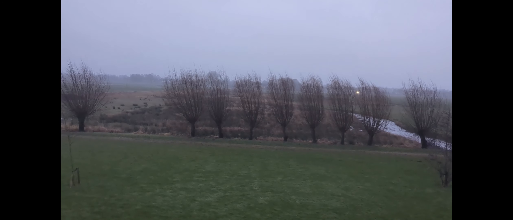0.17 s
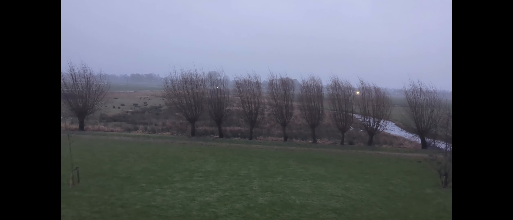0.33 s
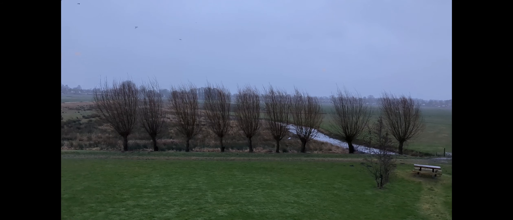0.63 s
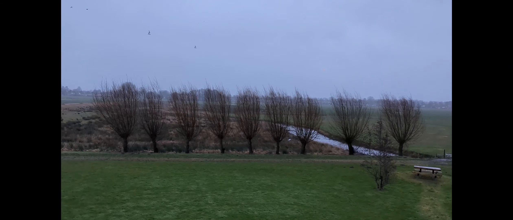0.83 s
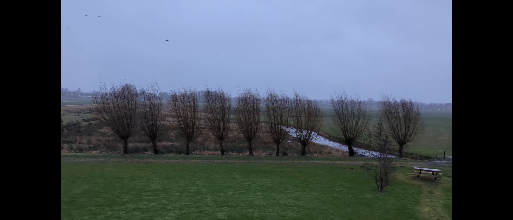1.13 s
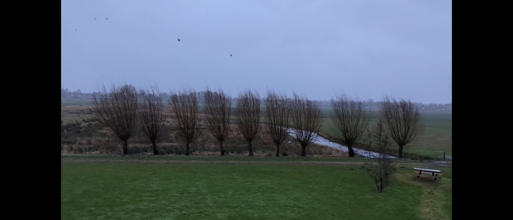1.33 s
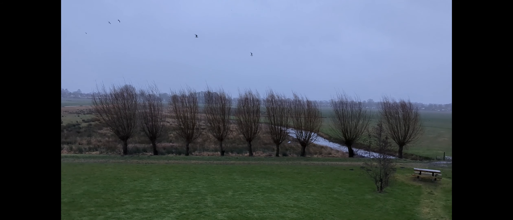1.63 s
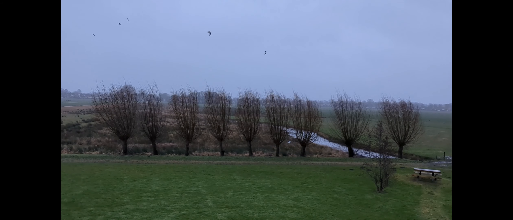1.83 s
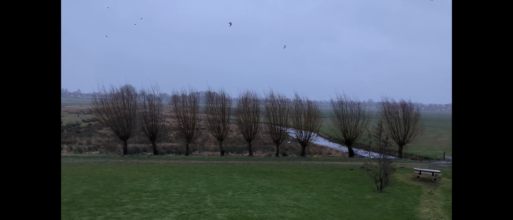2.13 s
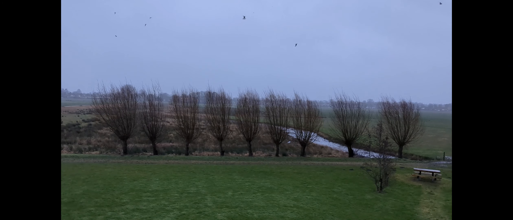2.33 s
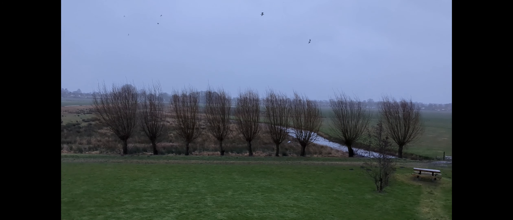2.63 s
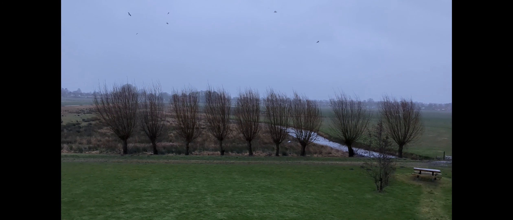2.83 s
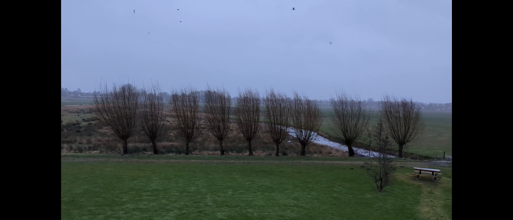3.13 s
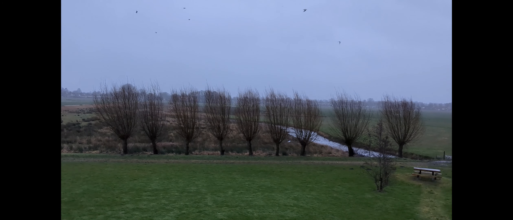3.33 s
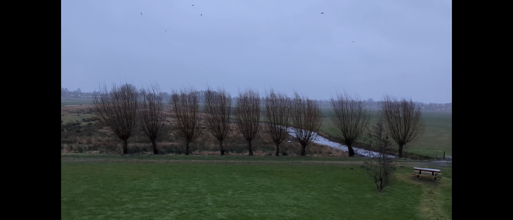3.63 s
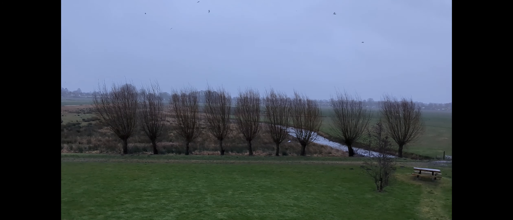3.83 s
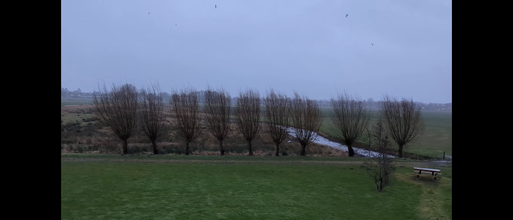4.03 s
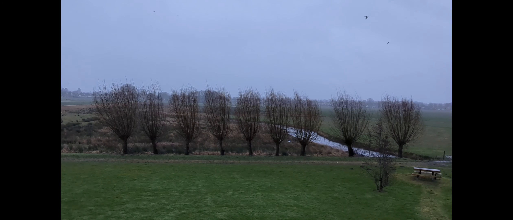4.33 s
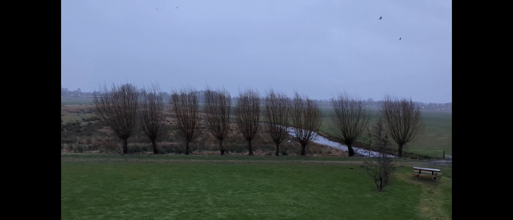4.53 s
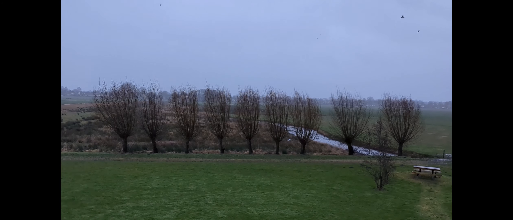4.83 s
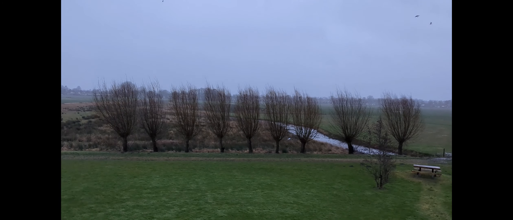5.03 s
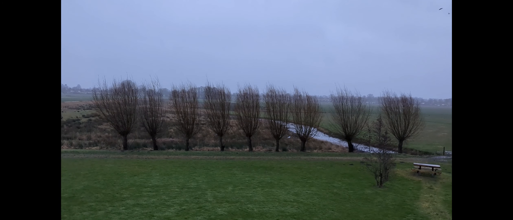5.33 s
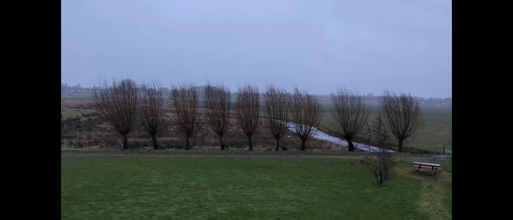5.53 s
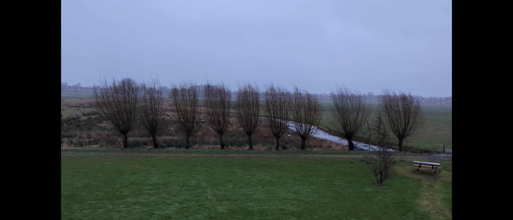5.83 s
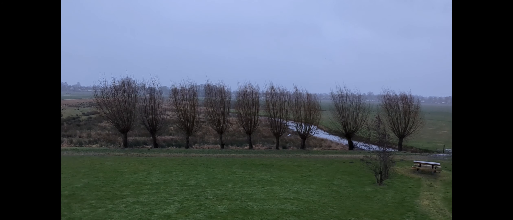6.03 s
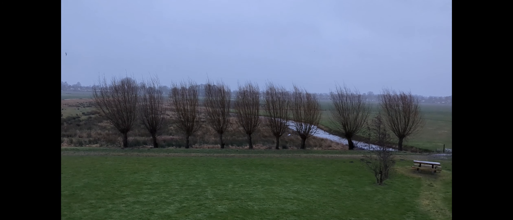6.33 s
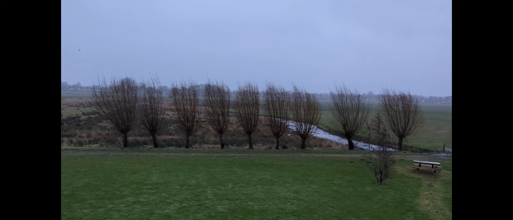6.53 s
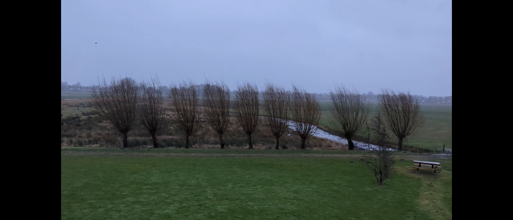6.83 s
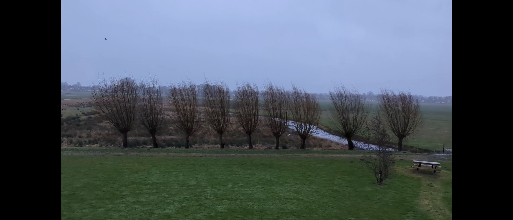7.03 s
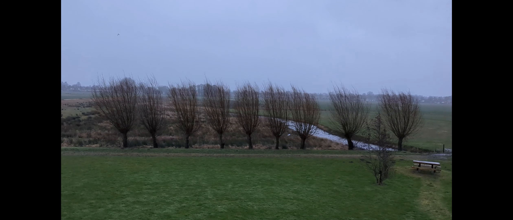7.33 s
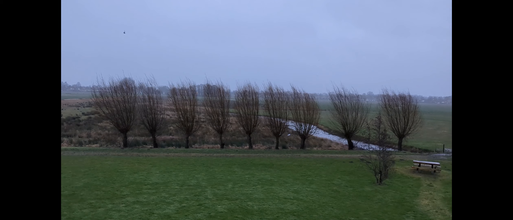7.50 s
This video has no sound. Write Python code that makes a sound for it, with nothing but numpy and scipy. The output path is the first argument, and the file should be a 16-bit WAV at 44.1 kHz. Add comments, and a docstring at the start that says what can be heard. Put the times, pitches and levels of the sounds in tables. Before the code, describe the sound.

After a brief hush and a dropout, gale-force wind rumbles on the microphone, swelling in gusts over the rush of distant trees.

```python
"""Gale over open fields

Open farmland, a row of bare willows some way off, a stereo microphone with two ports in the air.
Half a second of shelter: a soft far rush, three quick puffs on the left, a pop on the right.
The sound cuts out, blips, and returns with a click in the full wind. Up close, gusts buffet the ports,
air fizzes and spits over the housing and its edges whistle briefly; behind it all the willows roar."""
import sys
import numpy as np
from scipy import signal
from scipy.fft import rfft, irfft, next_fast_len
from scipy.io import wavfile
from scipy.ndimage import uniform_filter1d

SR = 44100
rng = np.random.default_rng(int(sys.argv[2]) if len(sys.argv) > 2 else 0)


def persist_wave(psi):
    """Save psi, clipped to +-1, as 16-bit WAV."""
    counts = np.round(np.clip(psi, -1, 1) * 32767).astype(np.int16)
    wavfile.write(sys.argv[1], SR, np.atleast_2d(counts).T)


N = 338015
FFT_SIZE = next_fast_len(N, True)
TIME, HZ = np.arange(N) / SR, np.fft.rfftfreq(FFT_SIZE, 1 / SR)

# strength of the wider gale, out in the willows: time_s, relative_db
GALE = [(0.68, -58), (1.05, -55.5), (1.4, -55), (1.68, -52.0), (1.95, -53.5), (3.15, -48), (4.65, -47.5),
        (4.98, -45.5), (5.4, -46.5), (5.72, -45.0), (6.3, -47.5), (6.85, -47.5), (7.66, -50.5)]


def gain_of(db):
    """Decibels to amplitude."""
    return 10 ** (np.asarray(db) / 20)


def unit_rms(x):
    """Scales to rms 1."""
    return x / np.sqrt(np.mean(x ** 2) + 1e-20)


def over_hz(points, hz=HZ):
    """Joins (frequency_hz, value) rows on a log-frequency axis."""
    frequency_hz, value = np.transpose(points)
    return np.interp(np.log(hz + 1), np.log(frequency_hz + 1), value)


def over_time(points):
    """Joins (time_s, value) rows, one value a sample."""
    return np.interp(TIME, *np.transpose(points))


def burst(middle_s, length_s):
    """A smooth rise and fall."""
    return np.cos(np.pi * np.clip((TIME - middle_s) / length_s, -.5, .5))


def ports(balance_db):
    """Gains of the two ports; balance is always left minus right."""
    return gain_of(np.array([[.5], [-.5]]) * balance_db)


def pair(a, b, coherence):
    """Mixes two independent noises into partly alike left and right channels."""
    coherence = np.clip(coherence, -1, 1)
    shared, apart = np.sqrt((1 + coherence) / 2) * a, np.sqrt((1 - coherence) / 2) * b
    return np.array([shared + apart, shared - apart])


def filtered(x, gain):
    """Applies one gain to each frequency in HZ."""
    return irfft(rfft(x, FFT_SIZE) * gain, FFT_SIZE)[..., :N]


def lowpass(x, cutoff_hz):
    """Rolls off the treble without shifting phase."""
    return filtered(x, 1 / (1 + (HZ / cutoff_hz) ** 4))


def coloured(x, colour):
    """Shapes the spectrum by (frequency_hz, relative_db) rows; rms 1."""
    return unit_rms(filtered(x, gain_of(over_hz(colour))))


def flutter(rate_hz, depth_db):
    """A gain that wanders at random, up to about the given rate."""
    drift = unit_rms(lowpass(rng.standard_normal(N), rate_hz))
    return unit_rms(gain_of(depth_db * drift))


def steadied(x, window_s):
    """Evens out the slow swells of a noise, holding it near rms 1."""
    power = uniform_filter1d((x ** 2).mean(0), int(window_s * SR))
    return x / np.sqrt(uniform_filter1d(power, int(window_s * SR / 2)) + 1e-9)


def distant_noise(colour, coherence, balance, lag_rad=0):
    """Noise from afar: partly alike at the two ports, reaching the left one late by lag_rad."""
    noises = rfft(rng.standard_normal((2, N)), FFT_SIZE)
    spectrum = pair(*noises, over_hz(coherence)) * ports(over_hz(balance))
    spectrum[0] *= np.exp(-1j * lag_rad)
    return unit_rms(irfft(spectrum * gain_of(over_hz(colour)), FFT_SIZE)[:, :N])


def far_rush(level_db=-50):
    """The soft rush of distant wind, heard from a sheltered spot."""
    colour = [(20, -16), (70, 11), (200, 0), (350, 2.5), (650, -4.5), (850, -4), (1200, -5), (2050, 1),
              (3000, -13.5), (4000, -19.5), (5200, -26.5), (8000, -37.5), (15000, -44)]  # spectrum of the rush: frequency_hz, relative_db
    coherence = [(60, 0), (300, .9), (640, 0.68), (1400, 0), (5000, 0)]  # likeness of the ports: frequency_hz, coherence
    balance = [(100, 5), (700, -2), (2300, -4.5), (4400, 8), (8000, 7.5), (15000, 3)]  # lean to the left: frequency_hz, balance_db
    return gain_of(level_db) * distant_noise(colour, coherence, balance)


def puffs():
    """Stray eddies reach into the shelter and brush mainly the left port."""
    colour = [(20, -24), (70, -6), (110, -3), (190, -9), (350, -20), (1000, -46), (5000, -76)]  # spectrum of the eddies: frequency_hz, relative_db
    arrivals = [(.016, .035, -48, 12), (.057, .055, -49, 12), (.127, .035, -45, 14)]  # each puff: middle_s, length_s, level_db, balance_db
    eddies = steadied(coloured(rng.standard_normal((1, N)), colour), window_s=0.051)
    return eddies * sum(gain_of(level_db) * ports(balance_db) * burst(middle_s, length_s)
                        for middle_s, length_s, level_db, balance_db in arrivals)


def pop(start_s=.4213, level_db=-30, balance_db=-38.5, smear_hz=1100):
    """A hard slap of air hits the right port, which then swings slowly back to rest."""
    colour = [(15, -42), (40, -12.5), (62, 7), (100, 1), (170, 0.5), (380, 1), (700, -13.5), (1300, -7),
              (2000, -20), (3200, -26), (5000, -45), (9000, -74)]  # spectrum of the slap: frequency_hz, relative_db
    hz = np.fft.fftfreq(2 ** 13, 1 / SR)
    log_gain = np.log(gain_of(over_hz(colour, abs(hz))))
    minimum_phase = np.exp(np.conj(signal.hilbert(log_gain)))
    smear = np.exp(-2j * np.arctan(hz / smear_hz))  # the treble arrives first
    slap = np.fft.ifft(minimum_phase * smear).real
    placed = np.interp(TIME, start_s + TIME[:len(slap)], slap / abs(slap).max(), left=0, right=0)
    return gain_of(level_db) * ports(balance_db) * placed


def gusts():
    """Swings in dB of the near wind and the wider gale, and what surges add to the push and the fizz."""
    near_wind = [(0.68, -11.0), (1.4, -10), (1.68, -9.5), (2.15, -8.5), (2.5, -6.0), (2.9, -5.5), (3.2, -3),
                 (3.55, -3), (3.85, -6.5), (4.35, -3), (4.65, -4), (5.17, 1), (5.48, -5), (5.7, -2),
                 (6.35, -4), (6.95, -5), (7.25, -9.5), (7.66, -8.5)]  # strength of the wind at the microphone: time_s, relative_db
    surges = [(.95, 0.22, 0, 4), (1.677, 0.11, 3, 4), (1.81, .07, 5, -8), (2.108, .12, 1, 6),
              (2.496, 0.08, 5, 4), (2.556, 0.08, -5.5, 2), (3.164, .1, 3.5, 5.5), (3.272, 0.065, 6.5, 1),
              (3.4, 0.069, 1, 0), (3.657, 0.097, 5.5, -3), (4.46, 0.059, -7, 2.5), (4.54, 0.13, -5.5, -3),
              (4.846, 0.062, 1, 2.5), (4.995, .18, -2.5, 6.5), (5.12, 0.13, 1.5, 0),
              (5.268, 0.39, -0.5, 0.5), (5.63, 0.07, 9.5, 3.5), (5.792, 0.4, -3, 3.5), (6.16, 0.17, 4, 4),
              (6.266, 0.065, -12, 1), (6.547, 0.071, -4, 1), (6.863, 0.23, -1, 6), (7.476, 0.71, -6, 0.5)]  # brief surges and lulls: middle_s, length_s, push_db, fizz_db
    gale_db = over_time(GALE)
    push_db = sum(db * burst(middle_s, length_s) for middle_s, length_s, db, _ in surges)
    fizz_db = sum(db * burst(middle_s, length_s) for middle_s, length_s, _, db in surges)
    return over_time(near_wind), gale_db - gale_db.max(), push_db, fizz_db


def buffet(wind_db, push_db, base_db=-32):
    """Large eddies push slowly on both ports at once, in uneven shoves."""
    colour = [(15, -52), (30, -32), (40, -11), (50, 0.5), (58, 2.5), (75, 0.5), (100, -3), (150, -14.5),
              (250, -35.5), (600, -55), (3000, -100)]  # spectrum of the deep push: frequency_hz, relative_db
    noise = pair(*rng.standard_normal((2, N)), coherence=0.94)
    push = steadied(coloured(noise, colour), window_s=0.075)
    return gain_of(base_db + wind_db + push_db) * push * flutter(rate_hz=8, depth_db=1.8)


def tumble(wind_db, gale_db, push_db, base_db=-33.5):
    """Countless small eddies merge into a rolling rumble that grows with the wind."""
    colour = [(25, -43), (70, -11), (115, -5), (140, 1), (190, -1.5), (250, -3.5), (280, -7), (320, -5),
              (400, -11), (500, -21.5), (600, -16.5), (800, -25.5), (1300, -36), (6000, -70)]  # spectrum of the rumble: frequency_hz, relative_db
    noise = pair(*rng.standard_normal((2, N)), coherence=0.95)
    rumble = steadied(coloured(noise, colour), window_s=.12)
    strength = gain_of(base_db + 0.91 * wind_db + .15 * gale_db + 0.14 * push_db)
    return strength * rumble * flutter(rate_hz=13.4, depth_db=0.67)


def drifting_patches(roar, depth_db=1.5):
    """Narrow patches of the roar swell and fade at random, a faint shimmer."""
    frames = dict(nperseg=1024, noverlap=768)
    spectrogram = signal.stft(roar, **frames)[2]
    patches = uniform_filter1d(rng.standard_normal(spectrogram.shape[1:]), size=4, axis=0)  # in pitch
    patches = uniform_filter1d(patches, size=14, axis=1)  # in time
    spectrogram = spectrogram * gain_of(depth_db * unit_rms(patches))
    return unit_rms(signal.istft(spectrogram, **frames)[1][:, :N])


def willows(boost_db=5, twigs_above_hz=3200):
    """Some way off, the gale roars through bare branches, with the twigs' treble on top."""
    colour = [(40, -43), (400, 6.5), (750, 3), (1000, 0), (1500, 0), (2050, -1), (2500, -7), (3100, -10),
              (4000, -16), (4850, -20.5), (5400, -33.5), (6300, -26), (8000, -35.5), (15000, -51)]  # spectrum of the roar: frequency_hz, relative_db
    coherence = [(300, 0.62), (700, 0.9), (1100, 0.55), (1500, 0.57), (1850, 0.36), (2200, 0.16), (2700, 0)]  # likeness of the ports: frequency_hz, coherence
    balance = [(700, -0.5), (1300, 2.5), (2400, -1.5), (4000, -1.5), (8000, 1.5)]  # lean to the left: frequency_hz, balance_db
    left_lag = [(100, 3), (400, 0.88), (750, 0.87), (1000, 1.44), (1450, 2.5), (1700, 2.5), (2000, 0)]  # late arrival at the left port: frequency_hz, lag_rad
    twig_treble = [(.7, .5), (1.6, 0), (3.2, 3), (4.5, -0.5), (6.8, -2), (7.3, -6.5), (7.66, -6)]  # rise and fall of the treble: time_s, gain_db
    roar = drifting_patches(distant_noise(colour, coherence, balance, over_hz(left_lag)))
    body = lowpass(roar, twigs_above_hz)
    twigs = gain_of(over_time(twig_treble)) * (roar - body)
    return gain_of(over_time(GALE) + boost_db) * (body + twigs) * flutter(rate_hz=35, depth_db=.5)


def housing_fizz(airflow, rumble, base_db=-61.5, chop_db=0.8):
    """Air fizzes over the housing, mostly on the windward left, chopped by the push of the eddies."""
    colour = [(500, -19), (3000, 10.5), (5400, 3.5), (6400, 6.5), (8300, 0), (10500, 1.5), (12500, -5),
              (15200, -9)]  # spectrum of the fizz: frequency_hz, relative_db
    pressure = steadied(rumble, window_s=.3).mean(0)
    fizz = coloured(rng.standard_normal((2, N)), colour) * ports(balance_db=7.0)
    return gain_of(base_db + chop_db * pressure) * airflow * fizz * flutter(rate_hz=22, depth_db=1.5)


def stray_spits(per_s=18, spread_db=5, fall_s=0.013):
    """Envelope of small spits of air that come at random: each starts at once and dies away."""
    starts = rng.random(N) < per_s / SR
    sizes = gain_of(spread_db * np.clip(rng.standard_normal(N), -2, 2))
    return unit_rms(signal.lfilter([1], [1, -np.exp(-1 / (fall_s * SR))], starts * sizes))


def spurts(airflow, sizzle_db=-8.0, sizzle_s=0.18, ticks_per_s=8000, stray_db=-72.5):
    """Flow breaks away from the left port's edge and spits in dense ticks, inside a longer sizzle."""
    colour = [(2000, -30), (7000, -10), (10500, 0), (12500, -3), (14000, -7), (15300, 3.5)]  # spectrum of the ticks: frequency_hz, relative_db
    breakaways = [(.99, .02, -83), (1.705, .04, -76), (2.335, .02, -75), (2.925, .025, -72),
                  (3.17, .04, -74), (3.28, .04, -73), (3.667, .025, -71), (4.075, .03, -73),
                  (4.17, .02, -72), (4.27, .03, -73), (4.46, .04, -70), (4.945, .04, -62),
                  (5.065, .07, -62), (5.165, .04, -61), (5.233, .04, -65), (5.337, .09, -62),
                  (5.495, 0.068, -62), (5.635, .03, -68), (5.733, .04, -66), (5.805, .05, -61),
                  (6.187, .035, -65), (6.385, 0.073, -66), (6.517, .05, -64), (6.75, .02, -74.5),
                  (6.865, .035, -67), (7.055, .02, -66)]  # each sharp spurt: middle_s, length_s, level_db
    strength = sum(gain_of(db) * (burst(middle_s, length_s) + gain_of(sizzle_db) * burst(middle_s, sizzle_s))
                   for middle_s, length_s, db in breakaways)
    ticks = rng.laplace(size=(2, N)) * (rng.random((2, N)) < ticks_per_s / SR)
    spit = coloured(ticks, colour) * ports(balance_db=11.5)
    strays = gain_of(stray_db) * airflow * stray_spits()
    return (strength + strays) * spit * flutter(rate_hz=180, depth_db=2.3)


def clicks(fall_s=0.0016):
    """A sharp click, alike in both channels, as the sound cuts out and as it returns."""
    steps = [(.5655, -41), (0.6748, -40)]  # each click: start_s, peak_db
    return sum(gain_of(peak_db) * (TIME >= start_s) * np.exp(-abs(TIME - start_s) / fall_s)
               for start_s, peak_db in steps)


def edge_whistles(bandwidth_share=.03):
    """Vortices shed from an edge lock briefly onto an unsteady, gliding pitch."""
    # each whistle: middle_s, length_s, pitch_hz, glide_hz_per_s, level_db, balance_db
    whistles = [(1.957, 0.074, 4350, 5000, -66, -8), (2.138, .1, 4330, 1000, -65, -11),
                (3.364, 0.19, 4850, -0.5, -66, 4), (3.558, 0.12, 4860, 0, -65, 4),
                (3.71, .13, 4680, -1000, -66, 7), (4.61, .05, 4750, 0, -63, 4),
                (5.035, .02, 10000, 0, -57, 10), (5.62, 0.11, 4900, -1000, -65, 10),
                (5.81, 0.25, 4830, -500, -66.5, 12), (6.138, 0.055, 4780, 0, -65, 7),
                (6.25, 0.042, 4770, 0, -65, 9), (6.83, 0.18, 4660, -3000, -62, 6),
                (6.888, .018, 9850, 0, -61, 10)]
    out = np.zeros((2, N))
    for middle_s, length_s, pitch_hz, glide_hz_per_s, level_db, balance_db in whistles:
        sounding = abs(TIME - middle_s) < length_s / 2
        t = TIME[sounding] - middle_s
        smoothing = signal.butter(2, pitch_hz * bandwidth_share / 2, fs=SR)
        wander = signal.lfilter(*smoothing, rng.standard_normal((2, 2, SR // 2)))[..., -len(t):]
        phase = 2 * np.pi * (pitch_hz + glide_hz_per_s * t / 2) * t
        tone = unit_rms(wander[0] * np.cos(phase) + wander[1] * np.sin(phase))
        out[:, sounding] += gain_of(level_db) * ports(balance_db) * tone * signal.windows.cosine(len(t))
    return out * flutter(rate_hz=36, depth_db=1.5)


def scene(shelter_ends_s=.5075):
    """The sheltered moment, two short silences, then the open gale."""
    wind_gate = [(.526, -90), (.531, -14), (.552, 0), (.5655, 0), (.5656, -90), (.6744, -90), (.6745, 0)]  # the open wind fades in, cuts out, then returns for good: time_s, gain_db
    wind_db, gale_db, push_db, fizz_db = gusts()
    rumble = buffet(wind_db, push_db) + tumble(wind_db, gale_db, push_db)
    airflow = gain_of(0.78 * wind_db + 0.98 * gale_db + fizz_db)  # strength of the flow along the housing
    whistling = edge_whistles()
    open_wind = rumble + willows() + housing_fizz(airflow, rumble) + spurts(airflow) + whistling
    shelter = far_rush() + puffs() + pop()
    return shelter * (TIME < shelter_ends_s) + open_wind * gain_of(over_time(wind_gate)) + clicks()


def record(dry, cutoff_hz=15800):
    """The recorder's band limit cuts off the highest treble."""
    taps = signal.firwin(511, cutoff_hz, window=("kaiser", 9), fs=SR)
    return signal.oaconvolve(dry, taps[None], "same")


dry = scene()
out = record(dry)
persist_wave(out)
```